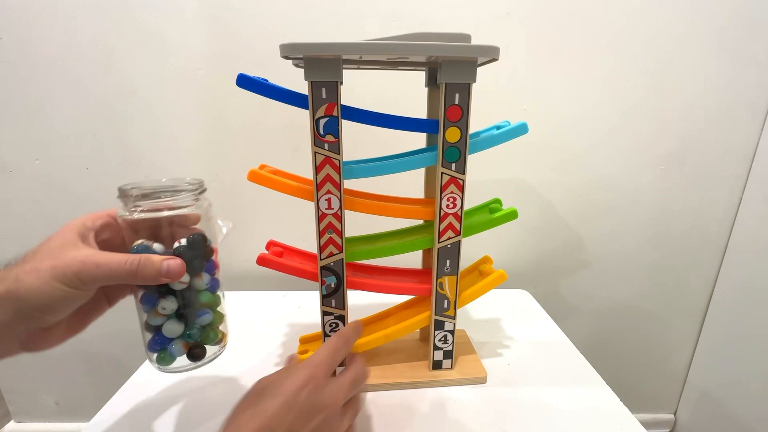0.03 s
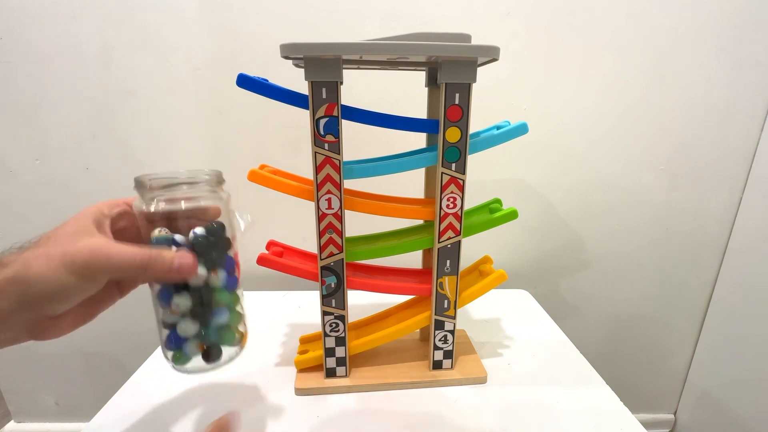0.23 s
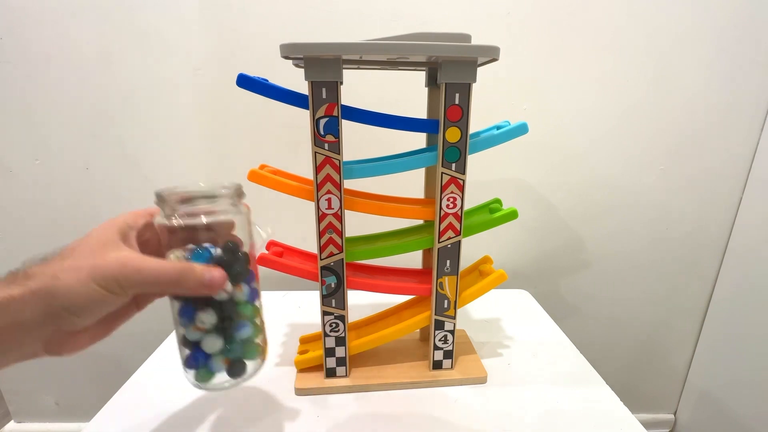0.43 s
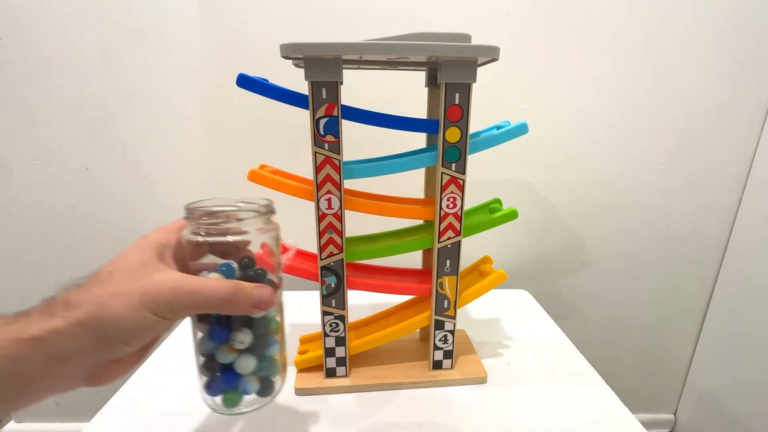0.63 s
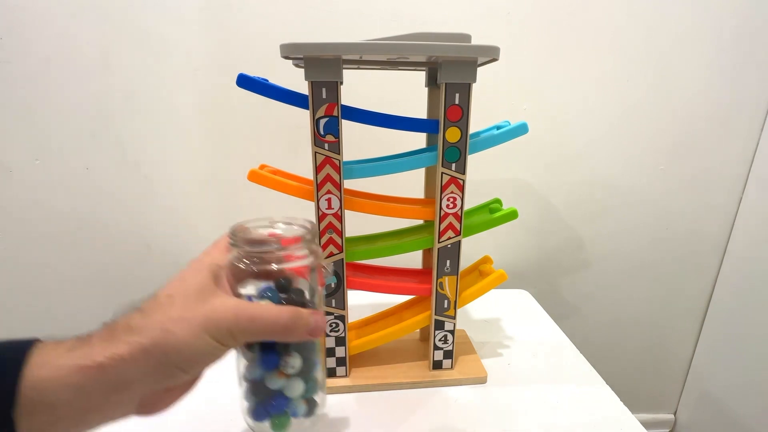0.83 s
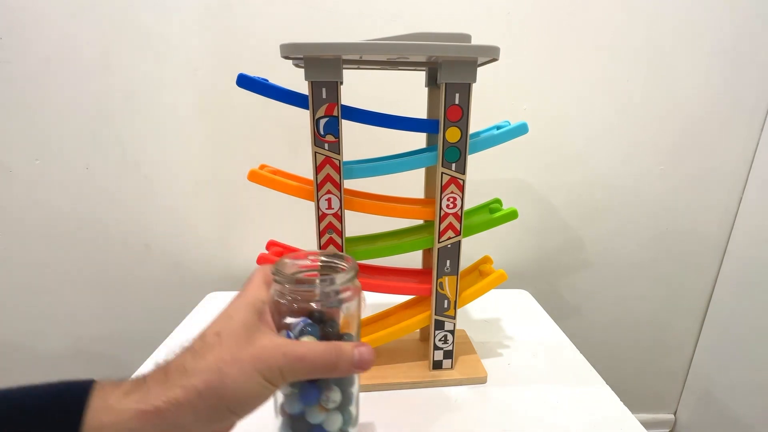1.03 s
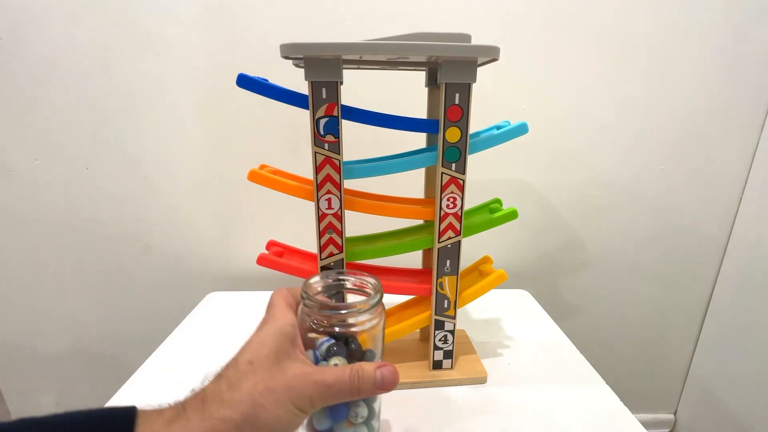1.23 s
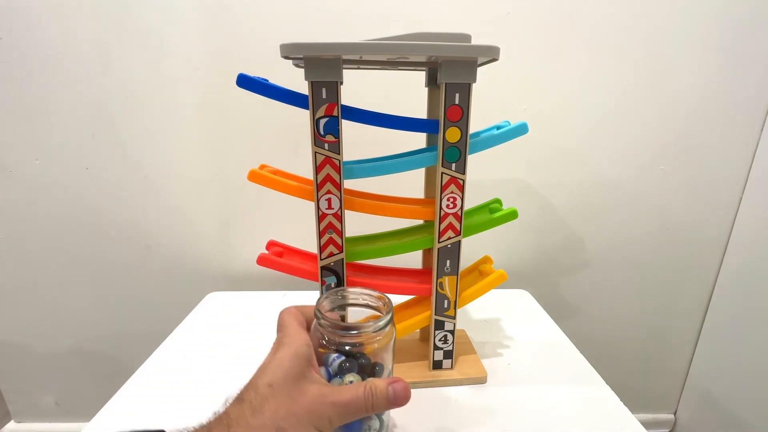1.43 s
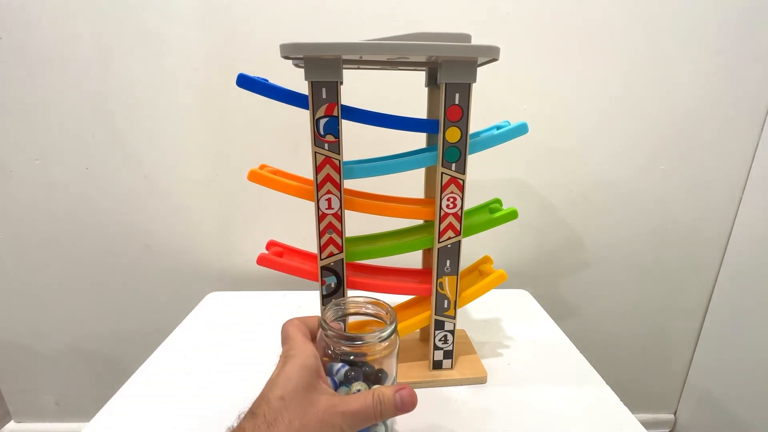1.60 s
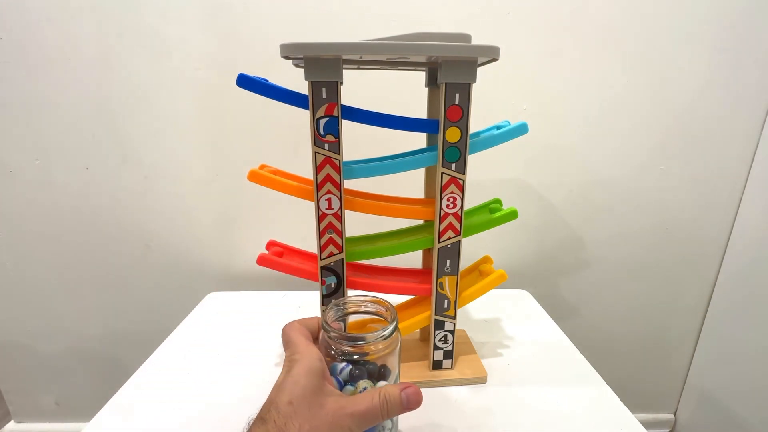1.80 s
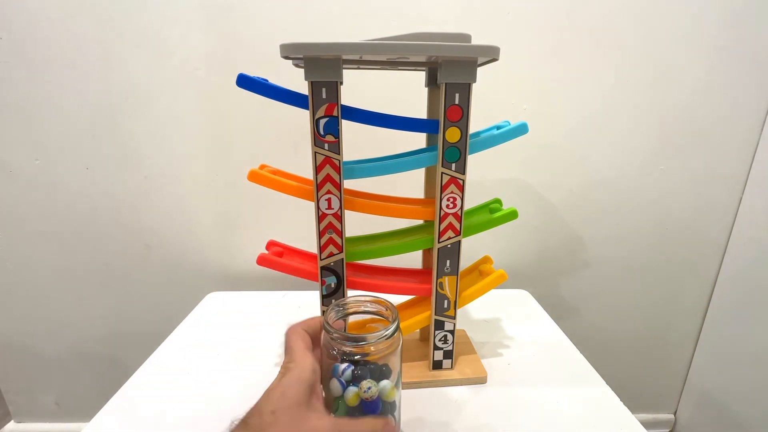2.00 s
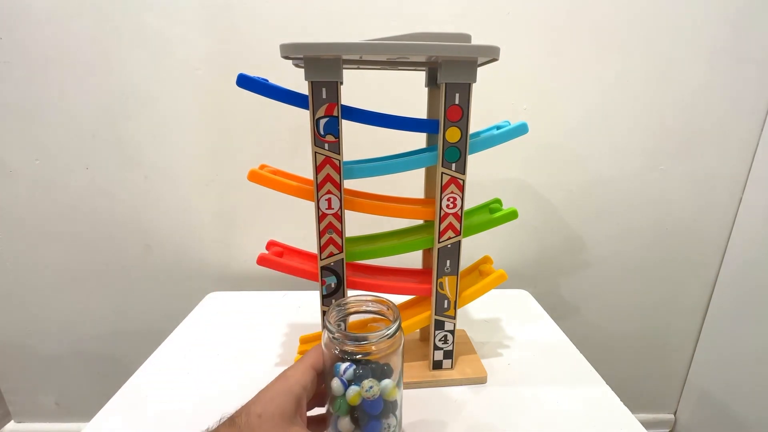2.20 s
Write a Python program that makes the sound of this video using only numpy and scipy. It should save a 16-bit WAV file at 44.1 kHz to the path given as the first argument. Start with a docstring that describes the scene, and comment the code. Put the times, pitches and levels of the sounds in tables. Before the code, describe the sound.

Marbles tumble and clink brightly inside a glass jar, then settle. After a pause the jar is set down on a table with a dull thud and slides faintly, in a small room with a short echo.

```python
"""Marbles tumble, clink and settle in a glass jar as it is tipped upright in a small bare room.
Each hit makes the glass ring, and the moving heap sounds a hollow note in the air inside.
The jar is set down on a table with a dull thud and rocks once. Then it is slid along, and tiny
slips of its base make the table groan. The room adds a short echo and a faint, steady noise."""
import sys
import numpy as np
from scipy import signal
from scipy.fft import rfft, irfft
from scipy.io import wavfile
from scipy.ndimage import uniform_filter1d, minimum_filter1d

SR = 44100
rng = np.random.default_rng(int(sys.argv[2]) if len(sys.argv) > 2 else 0)


def put_to_file(sound):
    """Save the sound as 16-bit audio at rate SR, in the file named by the first command-line argument."""
    columns = np.atleast_2d(sound).T  # one column per channel
    safe = np.clip(columns, -1, 1)
    whole_steps = np.round(safe * 32767)
    wavfile.write(sys.argv[1], SR, whole_steps.astype(np.int16))


N = 103635
T = np.arange(N) / SR
FFT_SIZE = 2 ** 17
HZ = np.maximum(np.arange(FFT_SIZE // 2 + 1) * SR / FFT_SIZE, 1)
LEFT_RIGHT = np.array([[.5], [-.5]])  # splits pan_db between the ears; positive is left
KNOCK_ECHO_S = .41  # like every fade_s, the time to die away by 60 dB

# Levels are in decibels; the hollow ring and the slide get their loudness from their level tables.
# marbles hit the glass and each other: time_s, level_db, pan_db
CLINKS = [(.068, -34.5, 1.5), (0.096, -32, 0), (0.109, -19.5, -3), (0.1314, -23.5, 18), (0.1923, -9.5, 8.5),
          (.2015, -14, -26.5), (.204, 6, -1.5), (0.2158, 3.5, 2), (0.2274, 0.5, -9), (0.238, 4, -8),
          (0.2486, -4.5, -2.5), (0.2549, 6.5, -2.5), (.2575, -17.5, -0.5), (0.267, 6.5, -4),
          (0.2714, -5.5, 8.5), (0.2718, 3, -11.5), (0.28, -4.5, 5), (.286, -0.5, -5), (0.291, -4, 1),
          (.312, 0, -11.5), (0.318, -9, 4.5), (.337, 2.5, -3), (0.339, -5.5, 13.5), (0.3513, -14, 0.5),
          (0.379, -8.5, -4), (0.385, 4, -2.5), (.391, 3.5, 4.5), (0.393, -10, -17), (.409, 7, 1.5),
          (.419, -3, -2), (0.432, -35, -23), (0.44, -14, 11), (.482, -18.5, 3), (.502, -6, -1.5),
          (0.514, -13, 1), (0.7252, -22, 3.5), (1.618, -39, 14), (1.63, -44, 7)]
# strength of the small hits in the shifting heap: time_s, level_db
HEAP_LEVEL = [(0, -48.5), (.1, -44), (.15, -39), (.188, -29), (.21, -12.5), (.25, -8.5), (.28, -2),
              (.35, -12), (.42, -12.5), (.5, -19.5), (.56, -42), (.8, -70)]
# tone of the filled jar: pitch_hz, gain_db
GLASS_TONE = [(100, -57), (300, -31.5), (450, -36.5), (750, -32.5), (1100, -13), (1700, -12.5), (2500, -8),
              (2900, 4.5), (3300, 4.5), (3900, -2), (4800, -2), (5700, -0.5), (6500, -6.5), (7400, -14.5),
              (7900, -3), (8700, -0.5), (9100, 5), (9600, -2), (10600, -5.5), (11200, 1.5), (11700, -6),
              (12200, -27), (12800, -7.5), (13700, -6.5), (14700, -17), (15500, -42.5)]
# left-right balance of the glass: pitch_hz, pan_db
GLASS_PAN = [(750, 10.5), (1050, 3.5), (1600, 1.5), (2800, 0), (3400, 5.5), (3900, 8), (4600, 9),
             (5700, 4.5), (6500, 4), (7600, 1), (8500, -4.5), (9100, -11), (9900, -1.5), (10700, -0.5),
             (11500, -1), (14000, 0)]
# notes of the jar's wall: pitch_hz, level_db, fade_s
WALL_NOTES = [(1196, -60, .06), (2826, -48.5, .05), (3060, -42.5, 0.16), (3334, -50, .1),
              (4639, -53.5, 0.15), (4770, -53, .12), (4930, -50.5, .12), (8820, -52.5, .12),
              (9017, -50, .16), (9060, -48, .16), (9480, -47, .12)]
# tone of the room's echo of the glass: pitch_hz, gain_db
GLASS_ECHO_TONE = [(1000, 2), (3500, -9.5), (6000, 0.5), (9000, -7), (11000, -17), (14000, -12.5)]
# notes of the air in the jar: pitch_hz, level_db, fade_s
HOLLOW_NOTES = [(524, 4, 0.31), (560.5, 1, 0.07)]
# loudness of that hollow ring: time_s, level_db
HOLLOW_LEVEL = [(.02, -70), (.13, -63.5), (.185, -60.5), (.21, -41), (.265, -40.5), (.35, -43), (.43, -48),
                (.52, -52), (.62, -71), (.7, -67)]
# the jar shifts in the hand or meets the table: time_s, level_db, cutoff_hz
THUDS = [(.102, -35.5, 257.5), (.125, -34.5, 260.7), (1.6014, 1.5, 3500), (1.8269, -17.5, 1130),
         (1.8376, -18.5, 1240), (1.8441, -16.5, 250)]
# notes of the table top and low notes of the room: pitch_hz, level_db, fade_s
TABLE_NOTES = [(99, -29.5, .14), (123.2, -26, 0.14), (156, -32, .16), (190.6, -23.5, .4),
               (252.9, -25.5, 0.46), (316, -26.5, 0.55), (327, -26, .38), (368.8, -27.5, 0.35),
               (430.1, -39, 0.4), (514.4, -30, 0.33), (617.5, -24, .13), (674, -24.5, 0.095),
               (833, -28.5, 0.11), (997, -30.5, 0.061), (1633, -38, 0.089), (2480, -33, 0.043)]
# tone of the knock: pitch_hz, gain_db
KNOCK_TONE = [(25, -33), (50, -14.5), (105, 3), (300, 3.5), (480, -3), (680, -1), (950, -4.5),
              (1300, -10.5), (1700, -16.5), (2100, -19.5), (2550, -23.5), (3200, -26), (4500, -30),
              (6500, -39), (9500, -26.5), (14000, -33)]
# left-right balance of the thuds: pitch_hz, pan_db
THUD_PAN = [(60, -0.7), (190, 1), (260, 2.5), (350, 6), (480, -1), (620, -5.5), (850, -1), (1500, 4.5),
            (2500, -0.5), (5500, 15), (9000, -6), (12000, -0.5)]
# loudness of the sliding jar: time_s, level_db
SLIDE_LEVEL = [(2.15, -73.5), (2.21, -60), (2.23, -50), (2.26, -46), (2.3, -48), (2.325, -42), (2.35, -48)]
# notes under the sliding base: pitch_hz, level_db, fade_s
SLIDE_NOTES = [(250, -27.5, .05), (370, -2, 0.19), (436, -4.5, .03), (612, -0.5, 0.12), (780, 1, 0.024),
               (992, -1.5, .03), (1213, -23, .04), (1624, -12.5, 0.03), (2370, -11.5, 0.041)]
# tone of the steady room noise: pitch_hz, gain_db
ROOM_NOISE_TONE = [(15, -45.5), (26, -24.5), (38, -10), (53, 1), (70, -4), (103, -11), (150, -23.5),
                   (185, -14.5), (255, -9), (300, -17), (370, -16.5), (490, -27.5), (710, -23.5),
                   (1060, -26), (1500, -25.5), (1800, -21), (2100, -15.5), (2500, -15), (2850, -25),
                   (3300, -27.5), (4000, -30.5), (5000, -33), (6000, -29.5), (7000, -31), (7600, -39),
                   (8300, -40.5), (9500, -56), (15000, -72.5)]
# how alike the room sounds in both ears: pitch_hz, likeness_0_to_1
EAR_LIKENESS = [(60, 0.94), (180, 0.9), (550, 0.4), (1650, 0.02), (15000, 0.1)]


def marbles():
    """Loud clinks and many small hits set the jar's wall ringing, and the room echoes them."""
    count, hits_per_s = 420, 500
    times = (np.arange(count) + rng.random(count)) / hits_per_s
    levels_db = np.interp(times, *np.transpose(HEAP_LEVEL)) + rng.uniform(-4.9, -3, count)
    small_hits = [(time_s, level_db, 0) for time_s, level_db in zip(times, levels_db)]
    size = 1500  # samples in one hit
    snap_shape = (fade(.0062) * (1 - np.exp(-T / .0005)))[:size]
    chatter_shape = from_db(-2) * fade(.041)[:size]
    hits = np.zeros((2, N))
    for time_s, level_db, pan_db in small_hits + list(CLINKS):
        start = int(time_s * SR)
        gain = from_db(7 + level_db + pan_db * LEFT_RIGHT)
        hits[:, start:start + size] += gain * clink(snap_shape, chatter_shape)
    wall = cut([ring(side, WALL_NOTES) for side in hits], "highpass", hz=700, order=4)
    jar = shape_tone(hits, at_pitch(GLASS_TONE)) + wall
    echo = shape_tone(room_echo(jar, fade_s=.67), at_pitch(GLASS_ECHO_TONE))
    return shape_tone(jar + echo, at_pitch(GLASS_PAN) * LEFT_RIGHT)


def clink(snap_shape, chatter_shape, likeness=.626):
    """One hit is a sharp snap, a brief chatter through the heap and a few pings."""
    size = len(snap_shape)
    noise = rng.standard_normal((5, size))
    snap = snap_shape * (np.sqrt(likeness) * noise[0] + np.sqrt(1 - likeness) * noise[1:3])
    chatter = chatter_shape * noise[3:]
    return unit_energy(snap + chatter + from_db(-9) * pings(size))


def pings(size, count=5, low_hz=2707, high_hz=11465, fade_s=.051):
    """Struck glass gives brief high tones, picked anew for each hit."""
    pitch_hz = low_hz * (high_hz / low_hz) ** rng.random((count, 1))
    tones = np.exp((2j * np.pi * pitch_hz - np.log(1000) / fade_s) * T[:size])
    ear_phases = np.exp(2j * np.pi * rng.random((2, count, 1)))
    return unit_energy((ear_phases * tones).imag.sum(axis=1))


def hollow_ring():
    """The tumbling heap keeps the air in the jar ringing with a hollow note."""
    note = cut(ring(rng.standard_normal(N), HOLLOW_NOTES), "highpass", hz=380)
    steady = note / np.sqrt(uniform_filter1d(note ** 2, 2205) + 1e-12)  # evened out over 50 ms
    return steady * from_db(np.interp(T, *np.transpose(HOLLOW_LEVEL), right=-200))


def jar_thuds():
    """The heavy base knocks on the table, which booms; softer touches are duller."""
    blows = np.zeros(N)
    for time_s, level_db, cutoff_hz in THUDS:
        click = signal.unit_impulse(N, int(time_s * SR))
        blows += from_db(level_db) * cut(click, "lowpass", cutoff_hz)
    burst = stereo_noise() * fade(.034)
    knock = from_db(-7) * blows + signal.fftconvolve(blows[None], burst, axes=1)[:, :N]
    knock = shape_tone(knock + room_echo(blows[None], KNOCK_ECHO_S), 19 + at_pitch(KNOCK_TONE))
    boom = ring(blows, TABLE_NOTES, delay_cycles=.73)  # low notes start later
    thuds = cut(boom + knock, "highpass", hz=52, order=4)
    return shape_tone(thuds, at_pitch(THUD_PAN) * LEFT_RIGHT)


def jar_slide(slips_per_s=1200):
    """Tiny uneven slips of the base make the table groan."""
    slips = (rng.random(N) < slips_per_s / SR) * rng.standard_normal(N)
    groan = cut(ring(slips, SLIDE_NOTES), "lowpass", hz=3500)
    loudness = from_db(np.interp(T, *np.transpose(SLIDE_LEVEL), left=-200))
    groan = loudness * groan / groan.std()
    return groan + from_db(4) * room_echo(groan[None], KNOCK_ECHO_S)


def room_echo(sound, fade_s, length_s=.9, wall_delay_s=.0044):
    """The echo starts with the nearest wall, and its high notes die sooner."""
    hz, time_s, spectrum = signal.stft(stereo_noise()[:, :int(length_s * SR)], SR, nperseg=256)
    fade_rate = np.log(1000) / fade_s * (1 + .15 * hz[:, None] / 10000)
    tail = signal.istft(spectrum * np.exp(-fade_rate * time_s), SR)[1]
    tail *= T[:tail.shape[1]] > wall_delay_s
    return signal.fftconvolve(sound, unit_energy(tail), axes=1)[:, :N]


def room_noise(level_db=-53):
    """The room has a low rumble and a faint hiss."""
    noise = shape_tone(stereo_noise(), at_pitch(ROOM_NOISE_TONE))
    return from_db(level_db) * noise / noise.std()


def stereo_noise():
    """White noise whose lows are alike in both ears and whose highs are not."""
    likeness = at_pitch(EAR_LIKENESS)
    shared, opposite = rfft(rng.standard_normal((2, FFT_SIZE)))
    spectrum = np.sqrt((1 + likeness) / 2) * shared + np.sqrt((1 - likeness) / 2) * opposite * [[1], [-1]]
    return irfft(spectrum)[:, :N]


def ring(push, notes, delay_cycles=0):
    """A pushed object rings with its own notes, each a fading sine wave."""
    total = 0
    for pitch_hz, level_db, fade_s in notes:
        decay = from_db(-60 / (fade_s * SR))
        angle = 2 * np.pi * pitch_hz / SR
        note = signal.lfilter([0, np.sin(angle)], [1, -2 * decay * np.cos(angle), decay ** 2], push + 1e-18)
        total += from_db(level_db) * np.interp(T - delay_cycles / pitch_hz, T, note, left=0)
    return total


def shape_tone(sound, gain_db):
    """Turn each pitch up or down by its own amount."""
    cepstrum = irfft(np.log(from_db(gain_db)))
    # folding this onto its first half keeps the filter from sounding ahead of a hit
    cepstrum[..., 1:FFT_SIZE // 2] *= 2
    cepstrum[..., FFT_SIZE // 2 + 1:] = 0
    return irfft(rfft(sound, FFT_SIZE) * np.exp(rfft(cepstrum)))[..., :N]


def cut(sound, kind, hz, order=2):
    """A "lowpass" keeps what is below hz; a "highpass" keeps what is above."""
    return signal.sosfilt(signal.butter(order, hz, kind, fs=SR, output="sos"), sound)


def fade(fade_s):
    """A falling curve with a total energy of one."""
    curve = np.exp(-np.log(1000) * T / fade_s)
    return curve / np.sqrt(np.sum(curve ** 2))


def unit_energy(stereo):
    """Scale a sound to an average energy of one per ear."""
    return stereo / np.sqrt(np.sum(stereo ** 2) / 2)


def at_pitch(table):
    """Fill in a table's values for every pitch in HZ."""
    pitch_hz, values = np.transpose(table)
    return np.interp(np.log(HZ), np.log(pitch_hz), values)


def from_db(db):
    """Turn decibels into a number to multiply by."""
    return 10 ** (np.asarray(db) / 20)


def scene():
    """Marbles, jar and table over the room's noise."""
    return marbles() + hollow_ring() + jar_thuds() + jar_slide() + room_noise()


def record(dry, cutoff_hz=16800, peak_limit=.92, window_samples=65):
    """Cut the very highest sounds and briefly turn down any peak that is too loud."""
    sound = signal.sosfilt(signal.cheby2(12, 70, cutoff_hz, fs=SR, output="sos"), dry)
    gain = peak_limit / np.maximum(np.abs(sound).max(axis=0), peak_limit)
    return sound * uniform_filter1d(minimum_filter1d(gain, window_samples), window_samples)


dry = scene()
out = record(dry)
put_to_file(out)
```